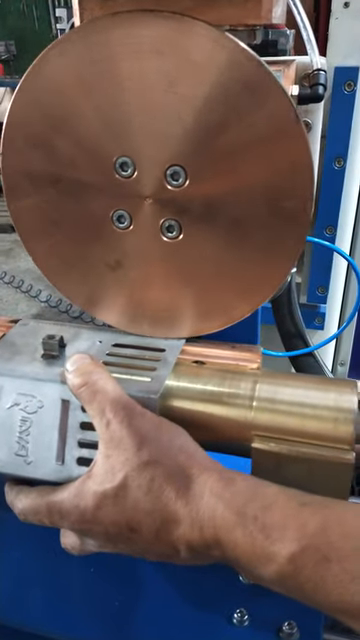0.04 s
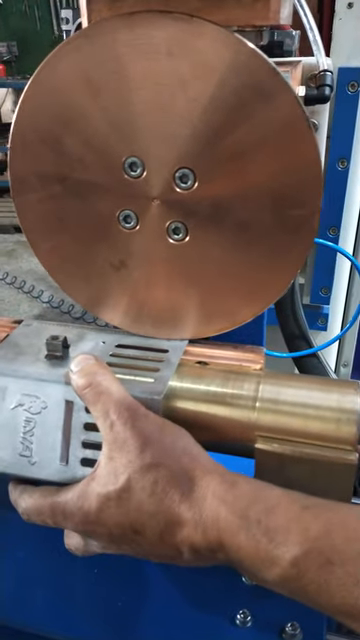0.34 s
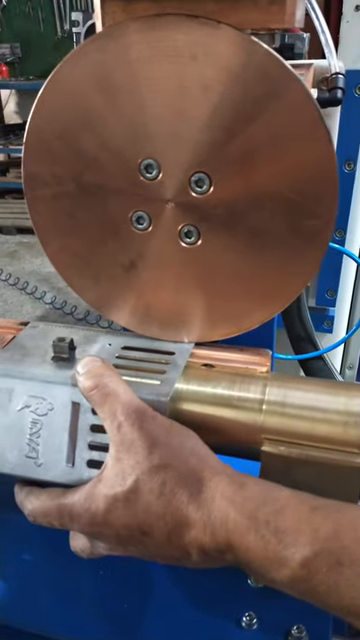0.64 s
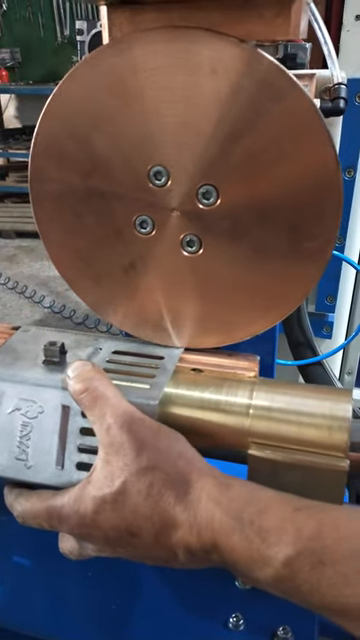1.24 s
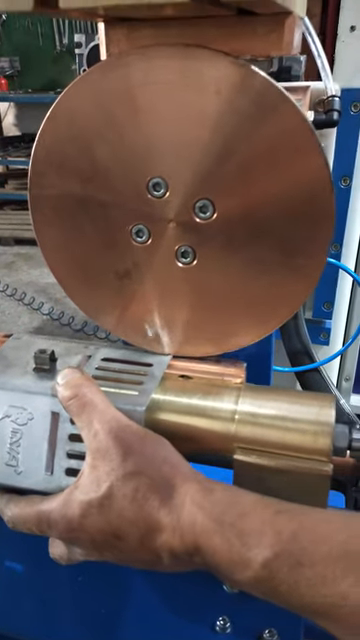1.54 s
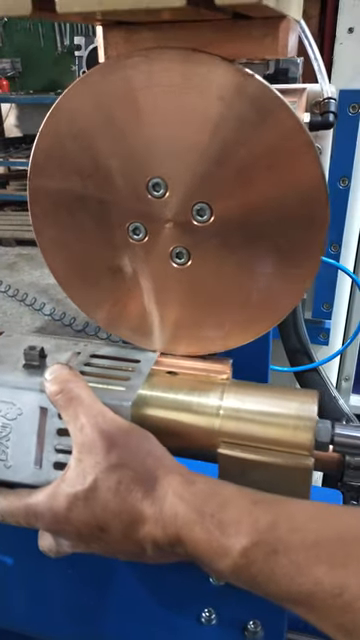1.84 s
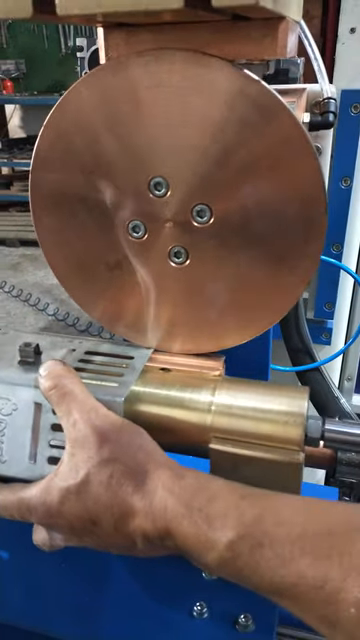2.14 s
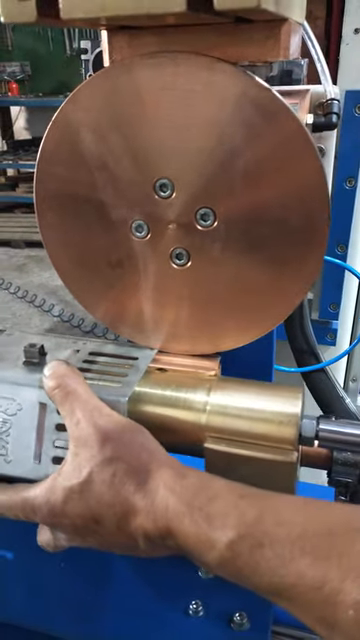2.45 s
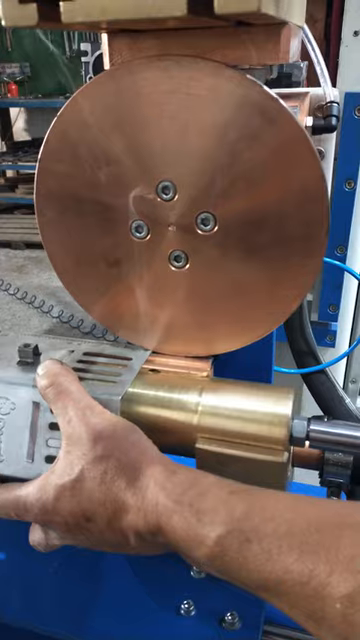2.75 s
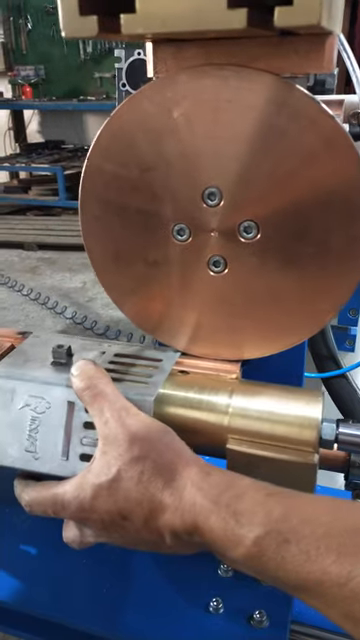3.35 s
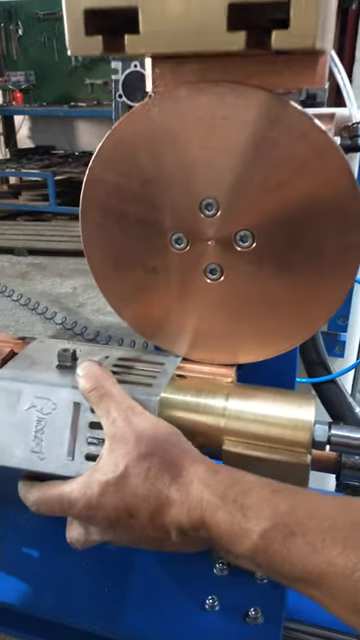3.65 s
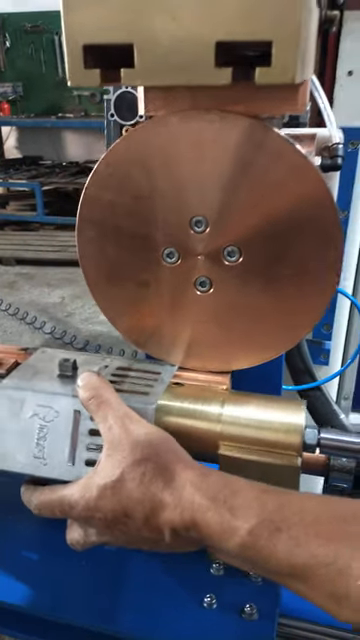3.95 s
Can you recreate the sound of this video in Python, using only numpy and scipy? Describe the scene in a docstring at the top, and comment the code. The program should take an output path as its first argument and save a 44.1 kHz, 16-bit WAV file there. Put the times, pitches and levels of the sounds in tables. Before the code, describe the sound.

A seam welder buzzes in rapid pulses and spits, then vents air with a hiss.

```python
"""Over a workshop's rumble and faint high whine, a seam welder hums and buzzes, close up: sixteen bursts
of mains current kick its frame and make its electrode sing. The copper wheel rasps on the steel part,
then the hot seam spits. A valve clicks and the head knocks lightly. The air cylinder vents with a blast
and a lasting hiss, under which come a few more knocks and the clink of a loose piece of metal."""
import sys
import numpy as np
from scipy import signal
from scipy.fft import rfft, irfft, next_fast_len
from scipy.io import wavfile
from scipy.ndimage import map_coordinates

SR = 44100
rng = np.random.default_rng(int(sys.argv[2]) if len(sys.argv) > 2 else 0)


def master_out(mix):
    """Clip the mix to full scale and print it as 16-bit PCM to the path in sys.argv[1]."""
    frames = np.transpose(np.atleast_2d(mix))
    ceiling = np.clip(frames, -1, 1)
    pcm = np.round(ceiling * 32767).astype(np.int16)
    wavfile.write(sys.argv[1], SR, pcm)


N = 176400

# room tone and the whine of leaking air: (frequency [Hz], relative level [dB])
SHOP_EQ = [(20, -5), (65, 13.5), (150, -1), (2800, -8.5), (4400, -22), (8000, -15), (10000, -22.5),
           (14500, -13.5), (15650, -0.5), (15880, -75)]
WHINE_EQ = [(12800, -42), (13150, 12), (13500, -2), (13800, -60)]
# pure tone in the whine: (frequency [Hz], level [dB])
WHISTLES = [(13496, -64)]
SHOP_DB, WHINE_DB, DRIVE_HZ, DRIVE_DB = -51, -61, 94, -54

FIRST_WELD_S, WELD_PERIOD_S, HALF_CYCLE_S = .0575, .16, .01
WELD_COUNT, KICKS_PER_WELD = 16, 6
WELD_STARTS_S = FIRST_WELD_S + WELD_PERIOD_S * np.arange(WELD_COUNT)
# hum within a weld, the housing's swells and a late, lower echo of them from a far wall: (frequency [Hz], level
# [dB], peak time [s], rise [s], fall [s])
HUM_SWELLS = [(99, -34.5, .0325, .019, .036), (94, -42, .119, .026, .05), (197, -43, .0213, .011, .026),
              (207, -42, .0725, .02, .058)]
# frame ring: (frequency [Hz], level per kick [dB], t60 [s], signed gain of every second kick [ratio])
FRAME_MODES = [(155.8, -61.5, 0.65, -0.83), (307.4, -63.5, 0.35, 0.78), (1198, -54, .16, 1),
               (1651, -54, 0.14, -0.79), (2167, -56.5, .08, -1.3), (2213, -54.5, 0.092, 1)]
HUM_SCATTER_DB, HUM_ROUGHNESS, FRAME_SCATTER_DB = .7, .18, 1.2
# colour of the rattling part: (frequency [Hz], relative level [dB])
BUZZ_EQ = [(50, 3), (220, 3), (450, -4.5), (750, -1), (950, -4), (1150, 2), (1500, -1), (2120, 4.5),
           (2380, -1.5), (2900, 4.5), (3400, -10), (5000, -19), (9000, -24), (15500, -14), (16500, -50)]
BUZZ_DB, BUZZ_FALL_S, HEAT_RISE_S, COLD_GAIN = -39, .0079, .0095, .89
# the electrode sings more once the seam is hot: (time [s], relative level [dB])
SING_GROWTH = [(.6, -8.5), (1.05, 0)]
SING_HZ, SING_SCATTER_HZ, SING_DB, SING_PEAK_S = 3015, 16, -38, .0039

# wheel rasps: (time [s], level before trim [dB], hold [s], treble against body [dB])
RASPS = [(0.07, -26.5, 0.016, -12), (0.2284, -36, 0.019, -1), (0.2676, -30, 0.0063, -4.5),
         (0.3873, -32.5, 0.0046, -11), (0.546, -42, .007, -6)]
# the rasp's body and bright edge: (frequency [Hz], relative level [dB])
RASP_BODY_EQ = [(200, -26), (1100, -5), (3700, 1), (4500, -17.5), (8000, -48)]
RASP_EDGE_EQ = [(2500, -21), (4200, 0), (6400, 6), (7200, -2), (15500, 6), (16500, -40)]
RASP_T60_S, RASP_TRIM_DB = .051, -3
# spits of hot metal: (time [s], sizzle level [dB], crack level before trim [dB])
SPITS = [(0.5821, -21.5, -41), (0.7063, -27, -44.5), (0.885, -18, -41), (1.033, -29.5, -46),
         (1.2222, -22.5, -42), (1.231, -19, -36.5), (1.372, -21, -39), (1.3794, -18.5, -38),
         (1.392, -19, -41), (1.543, -20.5, -36.5), (1.5511, -24, -36.5), (1.7038, -23.5, -49),
         (1.712, -21, -36.5), (1.718, -26, -42), (1.8638, -26, -48), (1.875, -29, -47),
         (1.8984, -33, -45.5), (2.0218, -26, -40.5), (2.0334, -27, -43), (2.186, -54, -36),
         (2.516, -57, -44)]
# a spit's airy top and midrange bite: (frequency [Hz], relative level [dB])
SIZZLE_EQ = [(3000, -33), (9000, -13.5), (14000, 7.5), (15700, 12.5), (17000, -70)]
CRACK_EQ = [(300, -19), (2600, 2.5), (6000, -11), (16000, -4.5)]
SPIT_LEAD_S, SIZZLE_T60_S, CRACK_T60_S, CRACK_TRIM_DB = .00085, .012, .022, 3.5
# resonances of the steel part: (frequency [Hz], boost [dB])
PART_PEAKS = [(1720, 8.2), (2210, 11.3), (2600, 12), (3170, 9.1), (3620, 13), (4400, 10), (6400, 12),
              (8060, 10.6), (9040, 11)]

# the valve's snap: (frequency [Hz], relative level [dB])
SNAP_EQ = [(300, -22), (1400, 2.5), (8000, -4), (16000, -21)]
# the valve's ring: (frequency [Hz], relative level [dB], t60 [s])
VALVE_MODES = [(1380, 0, .035), (2046, -1.5, 0.067), (2670, 1.5, 0.057), (2750, -21, .25),
               (4570, -8, 0.069), (5640, -11.5, 0.073), (7700, -5, 0.063)]
VALVE_S, SNAP_DB, VALVE_RING_DB = 2.581, -31, -32.5
# head knocks: (time [s], level [dB], t60 [s], centre [Hz], roll-off each side [dB per quarter octave])
KNOCKS = [(2.649, -50.5, 0.26, 555, 49), (3.0433, -35, 0.049, 400, 5), (3.533, -38, 0.16, 1590, 6.5),
          (3.574, -43, 0.18, 760, 9)]

# the vent's attack, tail and sustain: (frequency [Hz], relative level [dB])
BLAST_EQ = [(120, -11.5), (800, -5), (1800, -6), (2400, 6.5), (3800, -15), (10300, -20), (15700, -20),
            (15900, -70)]
EXHAUST_EQ = [(550, -16), (1400, -10), (1850, -13.5), (2200, 0.5), (2850, -2), (3150, -11.5), (4200, -25.5),
              (15700, -36), (15900, -62)]
HISS_EQ = [(200, -25), (700, -6.5), (2550, 5), (3700, -1), (8000, -4), (10000, -5.5), (15700, 6),
           (15850, -44)]
# resonances of the exhaust port: (frequency [Hz], boost [dB])
PORT_PEAKS = [(2230, 4.4), (7300, 3.7), (7850, 6.2), (9020, 4.5), (11200, 3.2), (13200, 3.4)]
VENT_S, BLAST_S, BLAST_HOLD_S, EXHAUST_T60_S = 3.0305, 3.054, .014, .86
PUFF_DB, BLAST_DB, EXHAUST_DB, HISS_DB, HISS_SAG_DB_PER_S = -39, -26.5, -33, -43, 3.5
# ring of the loose piece: (frequency [Hz], level [dB], t60 [s])
CLINK_MODES = [(1110, -42, .08)]
CLINK_S = 3.752

# reverb of the machine walls and of the hall: (frequency [Hz], t60 [s])
NEAR_DECAY = [(3000, 0.037), (15000, 0.012)]
HALL_DECAY = [(100, 1), (3000, 0.44), (15000, 0.098)]
TOP_HZ = 17000


def amp(db):
    """Decibels to gain."""
    return 10 ** (np.asarray(db) / 20)


def unit(x):
    """Scale to rms 1."""
    return x / np.sqrt(np.mean(x ** 2) + 1e-20)


def clock(samples=N):
    """Seconds at each sample."""
    return np.arange(samples) / SR


def along(points, hz):
    """Read a curve of (frequency [Hz], value) points on a log axis."""
    freqs, values = np.transpose(points)
    return np.interp(np.log(hz + 1), np.log(np.sort(freqs) + 1), values)


def filtered(x, response):
    """Shape x with a gain that depends on frequency."""
    size = next_fast_len(N + SR // 2)
    return irfft(rfft(x, size) * response(np.fft.rfftfreq(size, 1 / SR)), size)[:N]


def noise(eq, repeat=0):
    """Coloured noise of rms 1; the repeat share of its power loops with each weld."""
    fresh = rng.standard_normal(N)
    loop = np.resize(rng.standard_normal(round(WELD_PERIOD_S * SR)), N)
    white = np.sqrt(1 - repeat) * fresh + np.sqrt(repeat) * loop
    return unit(filtered(white, lambda hz: amp(along(eq, hz))))


def wobble(rate):
    """A smooth random curve, rate knots a second."""
    return map_coordinates(rng.standard_normal(int(N * rate / SR) + 4), [clock() * rate])


def add(track, s, sound):
    """Mix a sound in at time s."""
    part = track[max(round(s * SR), 0):][:len(sound)]
    part += sound[:len(part)]


def bursts(rows, attack):
    """Envelope of hits: (time [s], level [dB], hold [s], t60 [s])."""
    out = np.zeros(N)
    for s, db, hold, t60 in rows:
        t = clock(int((hold + 2 * t60) * SR))
        add(out, s, np.minimum(t / attack, 1) * amp(db - 60 * np.maximum(t - hold, 0) / t60))
    return out


def ringing(modes, samples=SR // 4):
    """One strike of modes: (frequency [Hz], level [dB], t60 [s])."""
    t = clock(samples)
    return sum(amp(db - 60 * t / t60) * np.sin(2 * np.pi * hz * t) for hz, db, t60 in modes)


def resonate(x, peaks, width_hz):
    """Play x through a ringing body: (frequency [Hz], boost [dB])."""
    def response(f):
        damping = 1j * f * width_hz
        return 1 + sum((amp(db) - 1) * damping / (hz * hz - f * f + damping) for hz, db in peaks)
    return filtered(x, response)


def reverb(x, decay):
    """A diffuse tail in which each frequency dies at its own speed."""
    hz, t, spectrum = signal.stft(rng.standard_normal(SR // 2), SR, nperseg=256)
    tail = signal.istft(spectrum * amp(-60 * t / along(decay, hz)[:, None]), SR, nperseg=256)[1]
    wet = signal.fftconvolve(x, tail / np.linalg.norm(tail))
    return np.pad(wet, (128, 0))[:N]  # 3 ms pre-delay


def workshop():
    """The bed: rumble, a thin whine of leaking air, and a drive that hums until the air vents."""
    def tone(hz, db):
        return amp(db) * np.sqrt(2) * np.sin(2 * np.pi * hz * clock() + wobble(6))
    drive = tone(DRIVE_HZ, DRIVE_DB) * np.clip((VENT_S - clock()) * 10, 0, 1)
    whine = amp(WHINE_DB + .99 * wobble(7.4)) * noise(WHINE_EQ)
    whistle = sum(tone(hz, db) for hz, db in WHISTLES)
    rumble = amp(SHOP_DB + .12 * wobble(5.3)) * noise(SHOP_EQ)
    return rumble + drive + whine + whistle


def weld_hum():
    """Each weld sets the housing humming, and a far wall sends the hum back a little later: overlapping swells,
    never quite alike, with a rough edge."""
    t, out = clock(SR // 4), np.zeros(N)
    fade_in = np.minimum(t / HALF_CYCLE_S, 1)
    for s in WELD_STARTS_S:
        for hz, db, peak, rise, fall in HUM_SWELLS:
            from_peak = t - peak
            swell = fade_in * np.exp(-(from_peak / np.where(from_peak < 0, rise, fall)) ** 2)
            gain = amp(db + rng.normal(0, HUM_SCATTER_DB))
            add(out, s, gain * swell * np.cos(2 * np.pi * hz * from_peak))
    return out * (1 + HUM_ROUGHNESS * wobble(170))


def kicks(weld_db, second_gain=1):
    """One magnetic kick per half cycle of the current, in every weld."""
    out = np.zeros(N)
    for s, db in zip(WELD_STARTS_S, weld_db):
        for k in range(KICKS_PER_WELD):
            gain = second_gain if k % 2 else 1
            out[round((s + k * HALF_CYCLE_S) * SR)] = gain * amp(db + rng.normal(0, .37))
    return out


def frame_ring():
    """The kicks ring the frame; each weld favours other modes."""
    out = np.zeros(N)
    for hz, db, t60, second_gain in FRAME_MODES:
        force = kicks(rng.normal(0, FRAME_SCATTER_DB, WELD_COUNT), second_gain)
        out += signal.fftconvolve(force, ringing([(hz, db, t60)], SR // 2))[:N]
    return out


def part_buzz():
    """Each kick rattles the part, a little harder as it heats within a weld."""
    t = clock(SR // 10)
    weld_age = (clock() - FIRST_WELD_S) % WELD_PERIOD_S
    heat = 1 - (1 - COLD_GAIN) * np.exp(-weld_age / HEAT_RISE_S)
    pulse = np.exp(-t / BUZZ_FALL_S) * (1 - np.exp(-t / .0011))
    rattle = signal.fftconvolve(kicks(rng.normal(0, .85, WELD_COUNT)), pulse)[:N]
    return amp(BUZZ_DB) * heat * rattle * noise(BUZZ_EQ, repeat=.57)


def electrode_song():
    """Each kick makes the electrode sing for a few milliseconds, at nearly the same pitch."""
    t, out = clock(SR // 50), np.zeros(N)
    age = t / SING_PEAK_S
    swell = age ** 2 * np.exp(1 - age ** 2)
    force = kicks(np.interp(WELD_STARTS_S, *np.transpose(SING_GROWTH)))
    for i in np.flatnonzero(force):
        hz = SING_HZ + SING_SCATTER_HZ * rng.standard_normal()
        add(out, i / SR, force[i] * swell * np.sin(2 * np.pi * (hz * t + rng.random())))
    return amp(SING_DB) * out


def wheel_rasp():
    """The wheel scrapes the seam in short, grainy strokes that ring the steel part."""
    body_hits = [(s, db, hold, RASP_T60_S) for s, db, hold, _ in RASPS]
    edge_hits = [(s, db + treble, hold, RASP_T60_S) for s, db, hold, treble in RASPS]
    body = bursts(body_hits, attack=.0011) * noise(RASP_BODY_EQ)
    edge = bursts(edge_hits, attack=.0011) * noise(RASP_EDGE_EQ)
    grain = unit(amp(4.5 * wobble(500)))
    return resonate(amp(RASP_TRIM_DB) * (body + edge) * grain, PART_PEAKS, width_hz=52)


def seam_spits():
    """The molten seam spits: a bright sizzle on top of a crack that rings the steel part."""
    sizzle_hits = [(s - SPIT_LEAD_S, db, .0007, SIZZLE_T60_S) for s, db, _ in SPITS]
    crack_hits = [(s - SPIT_LEAD_S, db + CRACK_TRIM_DB, .001, CRACK_T60_S) for s, _, db in SPITS]
    sizzle = bursts(sizzle_hits, attack=.00089) * noise(SIZZLE_EQ)
    crack = bursts(crack_hits, attack=.00097) * noise(CRACK_EQ)
    return sizzle + resonate(crack, PART_PEAKS, width_hz=52)


def valve_click():
    """The valve switches with a sharp snap and a short metallic ring."""
    out = bursts([(VALVE_S, SNAP_DB, .004, .03)], attack=.00016) * noise(SNAP_EQ)
    add(out, VALVE_S, amp(VALVE_RING_DB) * ringing(VALVE_MODES))
    return out


def head_knocks():
    """The head knocks as it shifts: broad bands of noise sound dull, narrow ones pitched."""
    out = np.zeros(N)
    for s, db, t60, hz, roll_off in KNOCKS:
        skirt_db = -16 * roll_off  # four octaves from the centre
        band = [(hz / 16, skirt_db), (hz, 0), (hz * 16, skirt_db)]
        out += bursts([(s, db, .006, t60)], attack=.00078) * noise(band)
    return out


def air_vent():
    """Air leaves the port: a puff, the blast, a fluttering tail dying with the pressure, a long hiss."""
    t = clock() - VENT_S
    blast = bursts([(BLAST_S, BLAST_DB, BLAST_HOLD_S, .07)], attack=.0016) * noise(BLAST_EQ)
    pressure = bursts([(BLAST_S, EXHAUST_DB, .005, EXHAUST_T60_S)], attack=.0022)
    exhaust = pressure * amp(2.6 * wobble(150)) * noise(EXHAUST_EQ)
    puff = bursts([(VENT_S, PUFF_DB, .004, .05)], attack=.00065)
    flow = np.clip(t / .018, 0, 1) * amp(HISS_DB - HISS_SAG_DB_PER_S * t)
    return resonate(blast + exhaust + (puff + flow) * noise(HISS_EQ), PORT_PEAKS, width_hz=270)


def loose_clink():
    """A loose metal piece rings briefly."""
    out = np.zeros(N)
    add(out, CLINK_S, ringing(CLINK_MODES))
    return out


def scene():
    """A close, centred mix; the machine walls answer first, then the hall."""
    ticks = seam_spits() + wheel_rasp() + valve_click()
    rattle = part_buzz() + electrode_song()
    vent = air_vent() + head_knocks() + loose_clink()
    near = reverb(amp(-12) * ticks + amp(-10.5) * rattle, NEAR_DECAY)
    hall = reverb(amp(-14) * ticks + amp(-11.5) * rattle + amp(-12.5) * vent, HALL_DECAY)
    mix = weld_hum() + frame_ring() + ticks + rattle + vent + near + hall + workshop()
    return np.tile(mix, (2, 1))


def record(dry):
    """A brick-wall low-pass takes off the very top."""
    return np.array([filtered(x, lambda hz: hz < TOP_HZ) for x in dry])


dry = scene()
out = record(dry)
master_out(out)
```